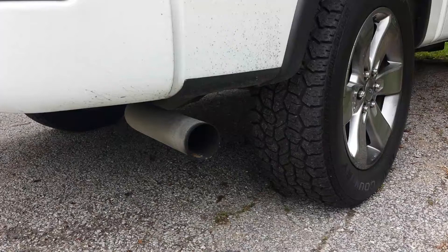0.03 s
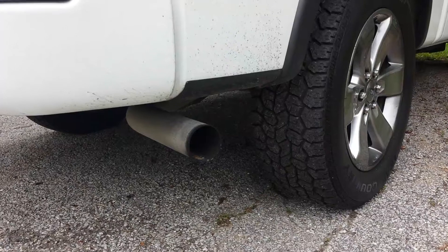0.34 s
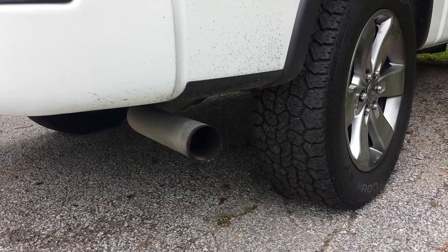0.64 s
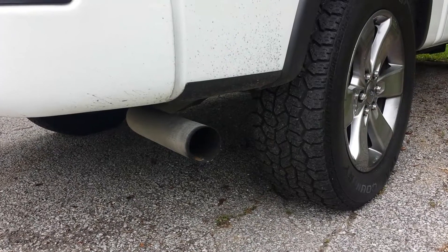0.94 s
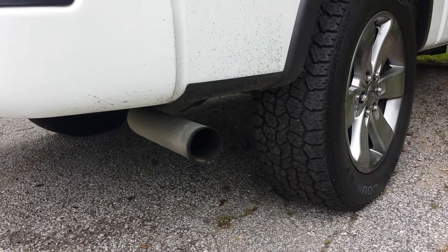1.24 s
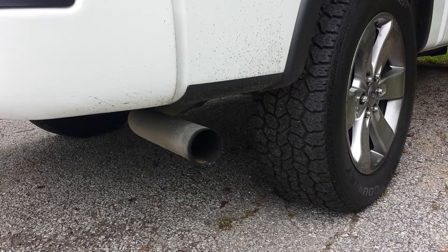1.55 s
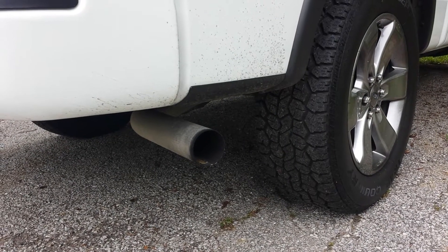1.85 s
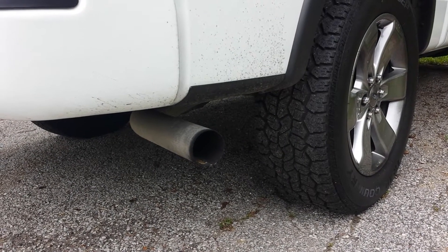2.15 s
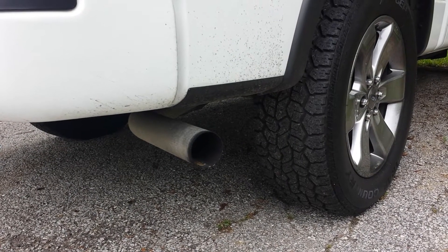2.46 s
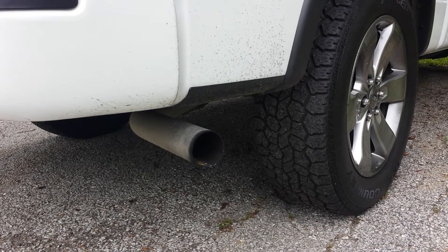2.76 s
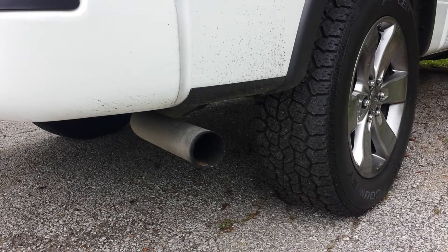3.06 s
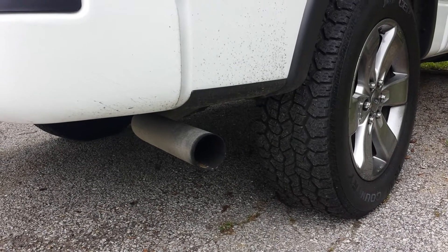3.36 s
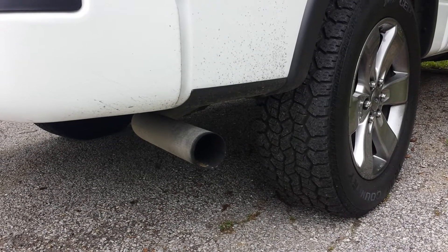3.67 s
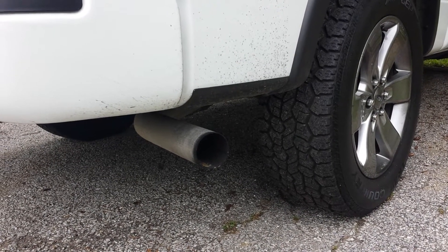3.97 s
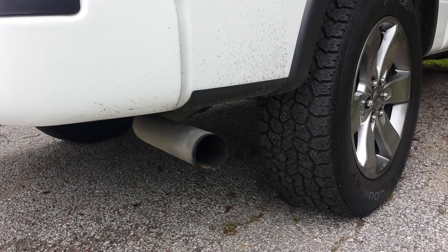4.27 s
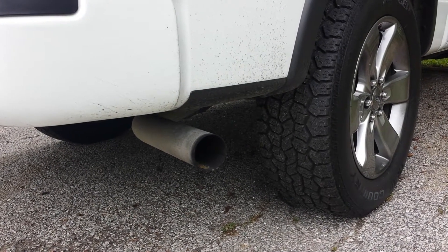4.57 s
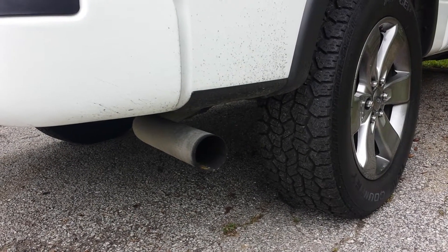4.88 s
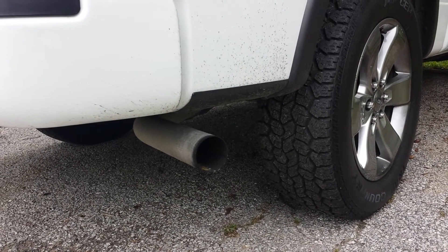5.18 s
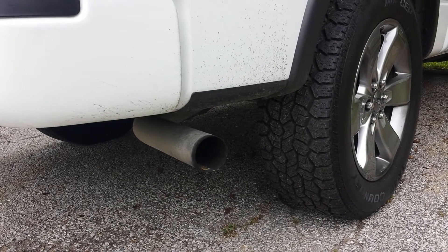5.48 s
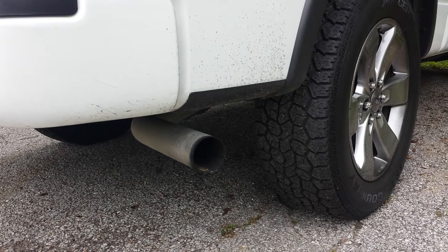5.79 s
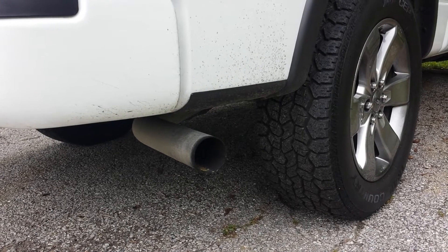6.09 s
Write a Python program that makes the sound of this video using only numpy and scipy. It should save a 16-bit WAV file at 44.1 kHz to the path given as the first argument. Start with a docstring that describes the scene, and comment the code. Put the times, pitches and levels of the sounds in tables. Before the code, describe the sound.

After a quiet stretch of distant traffic, birdsong and light wind, a truck cranks, fires and speeds up, heard beside the tailpipe.

```python
"""On a driveway, a pickup is started from cold, heard beside the tailpipe.
Traffic rumbles far away, birds call, wind puffs at the microphone and a few sharp ticks sound.
The starter gear slams in and grinds harder each time a piston squeezes the air in its cylinder.
Then the engine catches and speeds up, its firings booming in the exhaust pipe."""
import sys
import numpy as np
from scipy import signal
from scipy.fft import rfft, irfft, next_fast_len
from scipy.io import wavfile
from scipy.ndimage import uniform_filter1d

SR = 44100
rng = np.random.default_rng(int(sys.argv[2]) if len(sys.argv) > 2 else 0)


def store_pcm(level_fs):
    """Save levels as 16-bit WAV."""
    pcm = np.round(np.clip(level_fs, -1, 1) * 32767).astype(np.int16)
    wavfile.write(sys.argv[1], SR, np.atleast_2d(pcm).T)


N = 279594
TIME = np.arange(N) / SR
FIRE_S = 5.68   # when the engine starts to fire

# The background and the breeze fade in. Each row: time in seconds, level in dB.
FADE_IN = [(0, -77.5), (.41, -57.5), (.44, -18.5), (.52, -9.5), (.68, -0.5)]
# Which side a noise leans to. Each row: frequency in Hz, left minus right in dB.
AIR_SIDE = [(100, 2.5), (700, 5.5), (1300, 4), (2400, -1), (4400, 5.5), (6000, -0.5), (9000, -10),
            (14000, -5)]
TRUCK_SIDE = [(380, 5), (1300, 4), (4400, 4), (5600, 10), (7000, -5.5), (9000, -5), (11000, -44),
              (14500, -66)]
# Piston strokes that squeeze air and load the starter. Each row: start in seconds, level in dB.
STROKES = [(4.712, -24.5), (4.776, -25.5), (4.862, -23.5), (5.024, -23.5), (5.125, -23.5), (5.221, -22),
           (5.317, -22), (5.414, -22), (5.494, -22.5), (5.59, -23)]


def from_db(db):
    """Turn decibels into a gain."""
    return 10 ** (np.asarray(db) / 20)


def unit_power(x):
    """Scale a signal to an average power of 1."""
    return x / np.sqrt(np.mean(x ** 2) + 1e-20)


def in_time(rows):
    """Join rows that begin with a time into one curve for each other column."""
    seconds, *columns = np.transpose(rows)
    return [np.interp(TIME, seconds, column) for column in columns]


def at_hz(rows, hz):
    """Read between a table's rows, with frequency spaced by octaves."""
    row_hz, value = np.transpose(rows)
    return np.interp(np.log(hz + 1), np.log(row_hz), value)


def pan(side_db):
    """Left and right gains; a positive value leans left."""
    return from_db(np.array([[.5], [-.5]]) * side_db)


def cut(x, hz, kind="low", order=2):
    """Keep what lies below hz, or above it with "high"."""
    return signal.sosfilt(signal.butter(order, hz, kind, fs=SR, output="sos"), x + 1e-18)


def drift(hz):
    """A random wobble of about size 1, mostly slower than hz."""
    return unit_power(cut(rng.standard_normal(N + SR), hz)[SR:])


def steady(x, seconds):
    """Even out a signal so that its power stays near 1."""
    size = int(seconds * SR)
    power = uniform_filter1d(uniform_filter1d(x ** 2, size), size)
    return x / np.sqrt(np.abs(power) + 1e-4 * np.mean(x ** 2))


def bell(distance, half):
    """A smooth hump of height 1."""
    return np.exp(-np.minimum((distance / half) ** 2, 50) / 2)


def swells(rows):
    """Smooth rises and falls. Each row: peak time and half length in seconds, level in dB."""
    return np.sqrt(sum((from_db(db) * bell(TIME - s, half)) ** 2 for s, half, db in rows))


def noise(spectrum, sides):
    """Stereo noise of a given tone, alike on both sides in the bass but not in the treble."""
    # Each row: frequency in Hz, how alike left and right are from 0 to 1.
    likeness = [(60, 0.81), (640, 0.69), (1100, 0), (1700, 0), (3000, 0.084), (7000, 0)]
    size = next_fast_len(N)
    hz = np.fft.rfftfreq(size, 1 / SR)
    mid, side = rfft(rng.standard_normal((2, size)))
    alike, side_db = at_hz(likeness, hz), at_hz(sides, hz)
    pair = (np.sqrt(1 + alike) * mid + np.sqrt(1 - alike) * side * [[1], [-1]]) * pan(side_db)
    mono_gain = np.sqrt(np.cosh(np.log(from_db(side_db))) + alike)
    out = irfft(pair / mono_gain * from_db(at_hz(spectrum, hz)), size)[:, :N]
    return out / out.mean(axis=0).std()


def resonate(x, modes):
    """Let a signal ring at several pitches, added with alternating signs; narrow ones ring longer."""
    out = 0
    for k, (hz, width, db) in enumerate(modes):
        r = np.exp(-np.pi * width / SR)
        ring = signal.lfilter([1, 0, -1], [1, -2 * r * np.cos(2 * np.pi * hz / SR), r * r], x + 1e-18)
        out = out + (-1) ** k * from_db(db) * (1 - r * r) / 2 * ring
    return out


def scatter(x, t60, wet_db):
    """Trees and walls send back a wash of echoes that fades by 60 dB in t60 seconds."""
    age = np.arange(int(t60 * SR)) / SR
    tail = rng.standard_normal((2, len(age))) * from_db(-60 * age / t60)
    tail /= np.sqrt(np.sum(tail ** 2, axis=1, keepdims=True))
    return x + from_db(wet_db) * signal.fftconvolve(np.atleast_2d(x), tail, axes=1)[:, :N]


def outdoors():
    """Distant traffic rumbles, the air rustles in leaves and the gravel is scuffed a few times."""
    # The background slowly grows. Each row: time in seconds, rumble in dB, air in dB.
    levels = [(0.75, -47.5, -51), (1.3, -44.5, -50), (2.2, -43, -48.5), (3.7, -41, -48),
              (4.4, -37.5, -47.5), (4.65, -39.5, -46.3)]
    # The tone of each noise. Each row: frequency in Hz, relative level in dB.
    rumble_tone = [(20, -26), (60, -5.5), (100, -2), (135, 1.5), (200, -7.5), (300, -10.5), (450, -30.5),
                   (800, -35)]
    air_tone = [(240, -5), (400, 0), (816, -3.5), (994, -5), (1330, -8.5), (1850, -7), (2150, -3),
                (4010, -8.5), (4740, -3.5), (5510, -3), (6820, -7), (7930, -14), (9090, -12.5),
                (13900, -30), (15000, -17.5)]
    scuff_tone = [(300, -8), (600, 5), (1500, 6.5), (3300, 3.5), (6000, 5.5), (10000, -36)]
    # Gravel scuffs. Each row: peak time and half length in seconds, level in dB.
    scuffs = [(2.835, 0.0087, -44), (2.875, 0.032, -45.5), (2.975, 0.017, -45), (4.46, 0.0024, -42)]
    rumble_db, air_db = in_time(levels)
    rumble = from_db(rumble_db) * cut(noise(rumble_tone, AIR_SIDE), 570)
    air = from_db(air_db) * noise(air_tone, AIR_SIDE)
    return (rumble + air) * from_db(in_time(FADE_IN)[0]) + swells(scuffs) * noise(scuff_tone, AIR_SIDE)


def wind(breeze_peak_s=2.93, pop_s=3.433):
    """Swirls of air buffet the microphone on the right; one sharp knock pops on the left."""
    # Each row: peak time and half length in seconds, level in dB, share of small swirls from 0 to 1.
    gusts = [(1.397, .023, -28.5, 0), (1.547, 0.045, -24, 0), (2.036, 0.022, -25.5, 0.3),
             (2.106, 0.02, -25, 0.42), (2.155, .012, -19, 0.14), (2.57, 0.017, -14, 0.27),
             (2.659, 0.02, -26, 0.11), (2.88, 0.065, -31, 0.2), (3.239, 0.054, -26, 0),
             (3.466, 0.027, -22.5, 0.08), (3.966, 0.0088, -25, .15), (4.282, 0.031, -22.5, 0.04)]
    big_swirls = steady(cut(cut(rng.standard_normal(N), 64, "high"), 125, order=4), 0.033)
    small_swirls = steady(cut(cut(rng.standard_normal(N), 115, "high", order=3), 230, order=4), 0.07)
    breeze = from_db(-40 + 4 * drift(9) + in_time(FADE_IN)[0]) * bell(TIME - breeze_peak_s, 1.04)
    strength = np.hypot(swells([row[:3] for row in gusts]), breeze)
    share = in_time(gusts)[-1]
    buffeting = strength * (np.sqrt(1 - share) * big_swirls + np.sqrt(share) * small_swirls)
    age = np.maximum(TIME - pop_s, 0)
    pop = cut(from_db(-1.5) * (age > 0) * np.exp(-age / 0.0023) * (1 - age / 0.0025), 3000)
    return np.array([pop, buffeting])


def notes(rows, length_s, waver, flutter_db, fade_db=0):
    """Fluttering bird notes. Each row: start in seconds, first and last pitch in Hz, level in dB."""
    song = np.zeros(N)
    wobble = 1 + waver * drift(280)
    flutter = unit_power(from_db(flutter_db * drift(120)))
    size = int(length_s * SR)
    shape = signal.windows.tukey(size, .4) * from_db(-fade_db * np.linspace(0, 1, size))
    for s, start_hz, end_hz, db in rows:
        at = int(s * SR) + np.arange(size)
        pitch_hz = np.geomspace(start_hz, end_hz, size) * wobble[at]
        song[at] += from_db(db) * shape * np.sin(2 * np.pi * np.cumsum(pitch_hz) / SR)
    return song * flutter


def birds():
    """Far birds sing falling chirps, fading whistles and rising buzzes, blurred by the trees."""
    # Gliding calls. Each row: start in seconds, level in dB.
    chirps = [(.65, -58), (1.015, -50.5), (1.182, -48.5), (1.516, -53.5), (1.925, -57), (2.376, -51.5),
              (2.845, -45.5)]
    buzzes = [(1.51, -54.5), (1.82, -52.5), (2.088, -51.5), (3.75, -57), (3.955, -50.5), (4.48, -50)]
    # Calls on one note. Each row: start in seconds, pitch in Hz, level in dB.
    whistles = [(.73, 2163, -55.5), (1.111, 2673, -48.5), (1.58, 2160, -59.5), (1.951, 2681, -46)]
    song = notes([(s, 3600, 2785, db) for s, db in chirps], .065, waver=0.029, flutter_db=4.5)
    song += notes([(s, hz, hz, db) for s, hz, db in whistles], .28, waver=.01, flutter_db=2.5, fade_db=8)
    song += notes([(s, 4900, 5220, db) for s, db in buzzes], .14, waver=0.0376, flutter_db=2.5)
    return pan(2.3) * scatter(song, t60=.34, wet_db=3.5)


def ticks(crumble_s=0.0009, crumble=0.22):
    """Tiny hard things touch close by: each dry snap rings for a few cycles."""
    # Each row: start in seconds, strength in dB.
    snaps = [(2.4705, 3), (2.65, 4.5), (3.6972, 4), (3.8693, 9.5), (4.0022, 3), (4.161, 9)]
    # How a tick rings. Each row: pitch in Hz, width in Hz, gain in dB.
    tick_modes = [(2160, 690, -13.5), (4180, 1320, -4.5), (5540, 1470, 0.5), (6280, 1730, -4),
                  (9200, 830, -7)]
    out, age = np.zeros((2, N)), np.arange(SR // 100) / SR
    for s, db in snaps:
        snap = (age == 0) + crumble * rng.standard_normal((2, len(age))) * np.exp(-age / crumble_s)
        out[:, int(s * SR) + np.arange(len(age))] += from_db(db) * resonate(snap, tick_modes)
    return scatter(out, t60=0.26, wet_db=-25)


def flywheel():
    """The hardest blows of the gear teeth leave the engine's steel disc ringing."""
    # Each row: start in seconds, strength in dB.
    blows = [(4.714, -24), (5.03, -26), (5.518, -27.5), (5.62, -31.5)]
    # How the disc rings. Each row: pitch in Hz, gain in dB, seconds to fade by 60 dB.
    disc_modes = [(1022, -2, 0.48), (1078, -6, 0.43), (1550, -3, 0.21)]
    out = np.zeros(N)
    for s, db in blows:
        start = int(s * SR)
        age = TIME[:N - start]
        for hz, mode_db, t60 in disc_modes:
            out[start:] += from_db(db + mode_db - 60 * age / t60) * np.sin(2 * np.pi * hz * age)
    return pan(3.5) * out


def surge(s, rise_s, hold_s, die_s=.026):
    """One push on the starter builds, holds and dies away."""
    return np.clip((TIME - s) / rise_s, 0, 1) * np.exp(-np.maximum(TIME - s - hold_s, 0) / die_s)


def cranking(normal_stroke_s=0.101, rise_s=0.0082, hold_share=.45):
    """The engine resists turning. Gives the load on the starter and each stroke's slowness (normal: 1)."""
    starts = [s for s, db in STROKES]
    slam = from_db(-19) * surge(4.708, rise_s=.011, hold_s=0.02195)   # the gear slams in
    drag = from_db(-26) * surge(starts[0], rise_s, hold_s=0.1223)   # the resting engine is set moving
    load, slowness = np.maximum(slam, drag), np.ones(N)
    for (s, db), length in zip(STROKES, np.diff(starts + [FIRE_S])):
        rise = rise_s * (length / normal_stroke_s) ** 3.47   # slow strokes build far more gently
        load = np.maximum(load, from_db(db) * surge(s, max(rise, rise_s), hold_share * length + rise / 2))
        slowness[TIME > s] = length / normal_stroke_s
    return load, slowness


def starter(release_s=5.925, slip=0.028, droop=.08):
    """Gear teeth clash harder at every stroke and ring their metal housing; then the gear spins free."""
    # The starter bogs down, then recovers. Each row: time in seconds, base rate in teeth per second.
    tooth_rate = [(4.71, 780), (4.84, 685), (4.885, 490), (4.93, 486), (4.965, 486), (5.03, 540),
                  (5.25, 590), (5.55, 590)]
    # The tone of the grinding and of the shaking truck. Each row: frequency in Hz, relative level in dB.
    grind_tone = [(210, -45), (350, -14), (527, -6), (844, -13.5), (1040, -6), (1210, -12), (1580, -5.5),
                  (1740, -11.5), (1940, -6), (3590, -11.5), (6320, -8), (9660, -15), (12400, -28.5),
                  (13900, -25), (15000, -55)]
    shake_tone = [(25, 1), (60, 0.5), (110, 1), (160, -3.5), (210, -1), (270, -3), (350, -11.5), (600, -24)]
    # How the housing and the engine's big gear ring. Each row: pitch in Hz, width in Hz, gain in dB.
    housing_modes = [(465, 29, -5.5), (533, 15, -16), (657, 24, 0), (1013, 25, 7), (1061, 27, 1.5),
                     (1561, 10.5, 5.5), (1627, 20, 1), (1953, 32, -2.5)]
    gear_modes = [(5740, 42, -0.5), (6134, 48, 1.5), (6530, 56, -2), (6530, 70, 4), (6900, 50, -2),
                  (7100, 64, 2)]
    load, slowness = cranking()
    strain = cut(load, 10, order=1) / from_db(STROKES[-1][1])   # pushing harder slows the motor
    teeth = np.cumsum(in_time(tooth_rate)[0] * (1 - droop * strain + slip * drift(61.4))) / SR
    # each tooth lands with a short scrape of uneven strength
    contact = unit_power((3.2 + np.exp(-(teeth % 1) / 1.4)) * from_db(drift(420)))
    started = TIME > STROKES[0][0]
    # the whirr grows when the engine outruns the starter, and drops once the gear scrapes free
    stage_db = np.select([TIME < FIRE_S, TIME < release_s], [-31.5, -29], -36)
    release = swells([(release_s, 0.016, -24.5)])
    whirr = np.hypot(cut(started * from_db(stage_db), 3.8, order=1), release)
    grind = from_db(-0.73) * load * noise(grind_tone, TRUCK_SIDE)
    spin = from_db(-1) * whirr * cut(noise(grind_tone, TRUCK_SIDE), 1930, "high", order=1)
    blows = contact * (rng.standard_normal(N) + 0.5 * rng.standard_normal((2, N)))
    housing_ring = steady(cut(resonate(blows, housing_modes), 2720, order=4), 0.032)
    housing = from_db(-8) * np.hypot(load, 0.49 * whirr) * housing_ring
    gear_ring = cut(resonate(contact * rng.standard_normal((2, N)), gear_modes), 7900, order=4)
    gear = from_db(-7) * np.hypot(load, whirr) * unit_power(gear_ring)
    # the gears groan at the tooth rate and an octave up, deepest on slow strokes
    angle = 2 * np.pi * teeth
    gear_note = slowness ** 0.99 * np.sin(angle) + from_db(-7) / slowness * np.sin(2 * angle)
    groan = from_db(-13 + 1.8 * drift(42)) * load * np.sqrt(2) * gear_note
    # the turning engine shakes the truck and pumps air down the pipe
    shake = from_db(-38) * started * cut(noise(shake_tone, AIR_SIDE), 680)
    return contact * (grind + spin) + pan(4.7) * (housing + groan) + pan(-14.5) * gear + shake


def firing_pulses(firings, uneven_db=4.5, jitter_s=0.0003):
    """Each cylinder in turn lets out a burst of gas, a little uneven in time and strength."""
    # Each entry: one cylinder's strength in dB, in firing order.
    cylinders = [5, -24, -1, 4.5, -9, -5.5]
    at = np.flatnonzero(np.diff(np.ceil(firings)))
    time_error, level_error = rng.standard_normal((len(at), 2)).T
    at = np.clip(at + (jitter_s * SR * time_error).astype(int), 0, N - 1)
    pulses = np.zeros(N)
    pulses[at] = from_db(np.resize(cylinders, len(at)) + uneven_db * level_error)
    return pulses


def exhaust(catch_s=5.862, turbulence=0.0078):
    """Three firings for each turn of the engine ring the pipe; gas hisses out with every pulse."""
    # The engine speeds up, stumbling once. Each row: time in seconds, turns per second.
    engine_speed = [(5.8, 12), (5.9, 21.7), (5.95, 32.1), (5.995, 32.4), (6.04, 31.1), (6.11, 35),
                    (6.18, 35.3), (6.21, 35.6), (6.255, 38.6), (6.34, 39.8)]
    # How the muffler, the pipe and its wall ring. Each row: pitch in Hz, width in Hz, gain in dB.
    throb_modes = [(37, 23, -2), (63.5, 26.5, 6)]
    boom_modes = [(101.7, 3.3, 0)]
    drone_modes = [(147, 19, -6.5), (195.5, 3.6, 4)]
    rasp_modes = [(264, 8.6, 1.5), (302, 6.1, 4), (398.4, 7.8, 1.5), (487, 11.4, 7.5), (550, 11, 2.5),
                  (590, 8.9, -0.5), (680, 37, -19)]
    wall_modes = [(1620, 110, -25), (2016, 19, -1), (2420, 150, -31)]
    # The tone of the escaping gas. Each row: frequency in Hz, relative level in dB.
    hiss_tone = [(440, -32), (750, 2.5), (1050, -8.5), (1160, -12), (1650, -2), (1800, -10.5), (2040, 2),
                 (2290, -5.5), (3550, -12.5), (6900, -11), (8020, -20), (9670, -18), (15000, -38)]
    running = np.clip((TIME - FIRE_S) / 0.029, 0, 1)
    speed, = in_time(engine_speed)
    pace = speed / speed.max()   # every voice grows louder with speed
    firing_hz = 3 * speed
    firings = np.cumsum(firing_hz * (running > 0)) / SR
    valve_open = 0.43 + np.exp(-(firings % 1) / .5)
    flow = firing_pulses(firings) + turbulence * running * valve_open * rng.standard_normal(N)
    throb = cut(cut(resonate(flow, throb_modes), 73.4, order=6), 27, "high")
    throb = from_db(-22.5) * pace ** 0.57 * steady(throb, 0.024)
    # the pipe's lowest note swells when the firing rate meets it
    boom_swell_db = 11 * bell(firing_hz - boom_modes[0][0], 6.5)
    boom = cut(resonate(flow, boom_modes), 117, order=4)
    boom = from_db(-22 + boom_swell_db) * pace ** 1.1 * steady(boom, 0.043)
    # its second note swells when five or six times the engine speed meets it
    drone_swell_db = 8 * sum(bell(k * speed - drone_modes[1][0], 9.7) for k in (5, 6))
    drone = cut(cut(resonate(flow, drone_modes), 220, order=8), 124, "high", order=4)
    drone = from_db(-22.5 + drone_swell_db) * pace ** 1.28 * steady(drone, 0.021)
    burble_db = 2 * drift(18)
    rasp = cut(cut(resonate(flow, rasp_modes), 900, order=4), 257, "high", order=4)
    rasp = from_db(-21 + burble_db) * pace ** 2.2 * steady(rasp, 0.036)
    gas = from_db(-36.5) * pace ** 0.39 * valve_open
    # the rushing gas sets the thin pipe wall singing
    wall = from_db(-3) * gas * pace * unit_power(cut(resonate(rng.standard_normal(N), wall_modes), 3400))
    catch = from_db(8.5 * bell(TIME - catch_s, 0.038))   # the bass leaps at the first strong firings
    pipe = catch * (throb + boom + drone) + rasp + wall
    return running * (pan(5.3) * pipe + gas * noise(hiss_tone, TRUCK_SIDE))


def scene():
    """The quiet driveway, then the truck starting."""
    return outdoors() + wind() + birds() + ticks() + flywheel() + starter() + exhaust()


def record(dry, ceiling=0.97, cutoff_hz=14600):
    """The loudest peaks are rounded off and the highest treble is cut steeply."""
    rounded = dry / (1 + (dry / ceiling) ** 6) ** (1 / 6)
    return signal.sosfilt(signal.ellip(10, .1, 80, cutoff_hz, fs=SR, output="sos"), rounded)


dry = scene()
out = record(dry)
store_pcm(out)
```